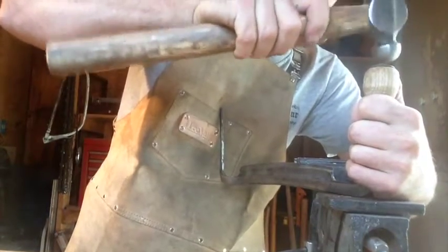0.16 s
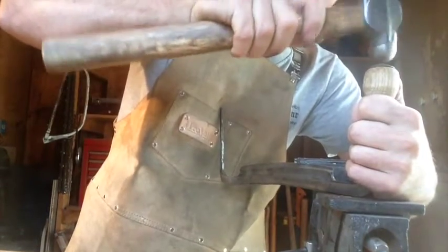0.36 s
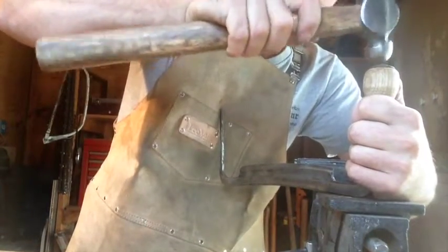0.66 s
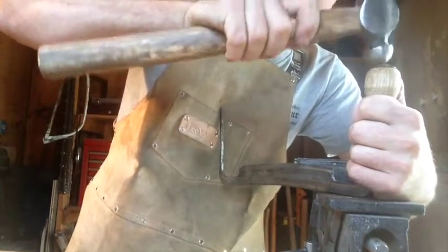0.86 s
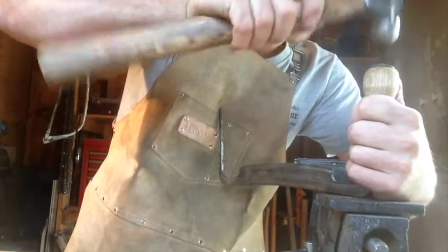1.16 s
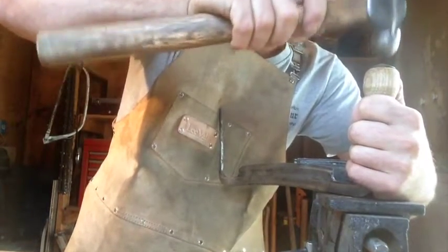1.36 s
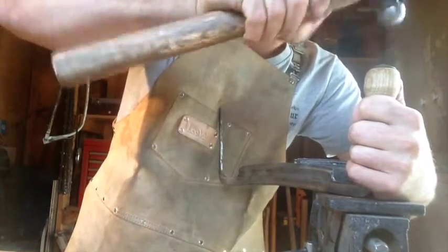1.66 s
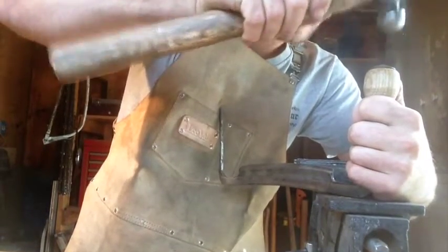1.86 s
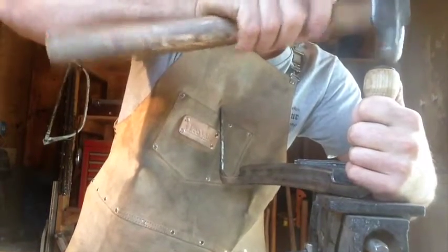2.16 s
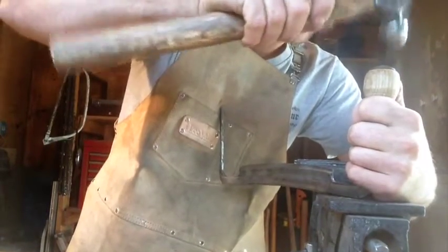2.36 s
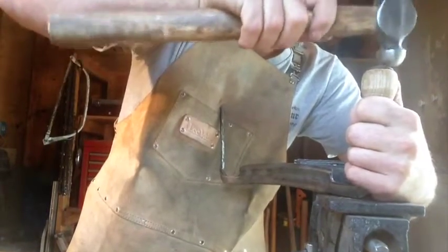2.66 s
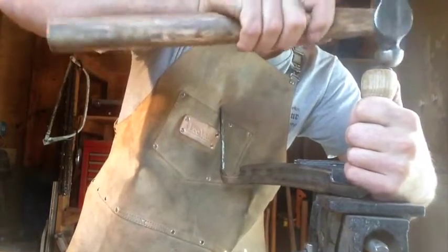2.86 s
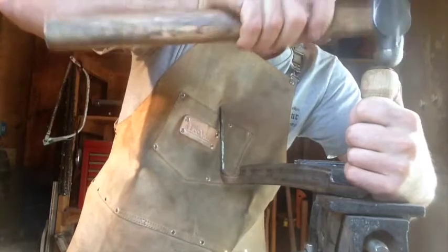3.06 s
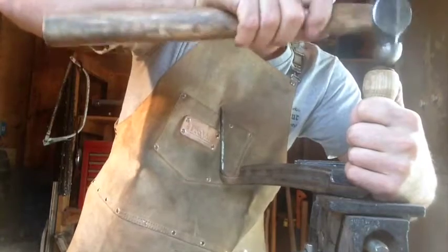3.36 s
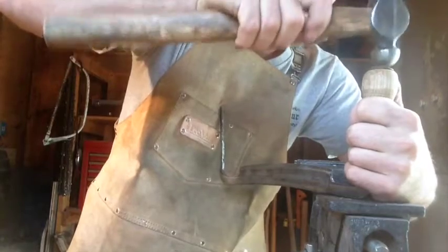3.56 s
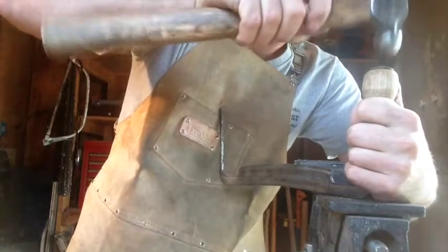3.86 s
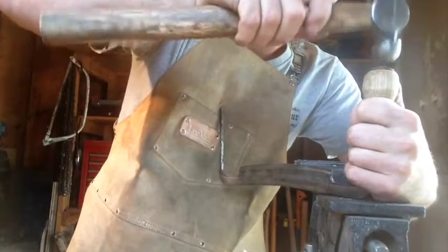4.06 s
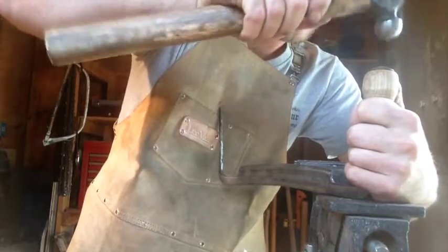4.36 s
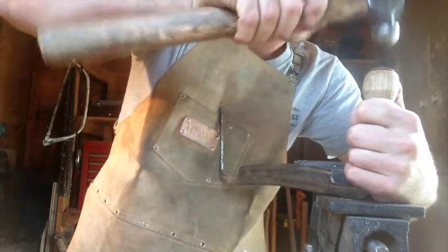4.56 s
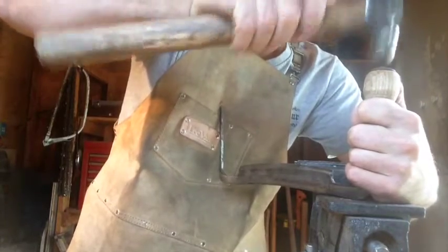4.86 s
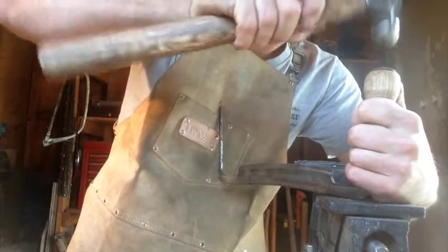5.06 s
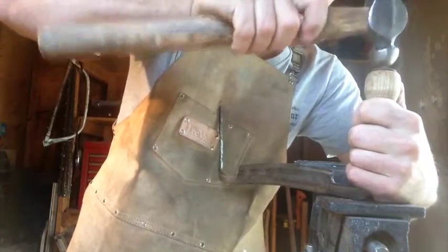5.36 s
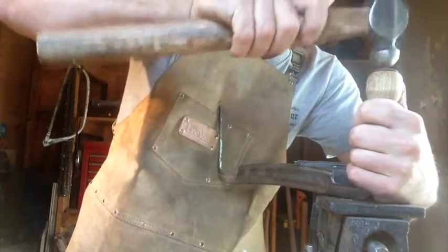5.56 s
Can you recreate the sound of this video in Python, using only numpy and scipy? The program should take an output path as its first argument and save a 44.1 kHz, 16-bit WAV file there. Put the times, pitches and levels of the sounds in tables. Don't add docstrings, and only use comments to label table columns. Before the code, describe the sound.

Steady light hammering on steel, recorded close by a phone in a dry wooden workshop. Every tap clicks hard, pings and clanks for a moment, then thumps the bench, which rocks back faintly. Strength and ring vary from blow to blow, and a few loose parts knock around 3.4 and 4.1 to 4.3 seconds. Behind it sit a barely audible ticking clock, soft leaf rustle and a low hush.

```python
import sys
import numpy as np
from scipy import signal
from scipy.fft import rfft, irfft, next_fast_len
from scipy.io import wavfile
from scipy.ndimage import uniform_filter1d

SR = 44100
rng = np.random.default_rng(int(sys.argv[2]) if len(sys.argv) > 2 else 0)


def master_out(mix):
    frames = np.transpose(np.atleast_2d(mix))
    ceiling = np.clip(frames, -1, 1)
    pcm = np.round(ceiling * 32767).astype(np.int16)
    wavfile.write(sys.argv[1], SR, pcm)


def invert_db(x):
    u = np.asarray(x, float) / 20
    return 10 ** u


N = 251935
RING = 12288
LEAD = 2000
AGE = np.arange(RING) / SR
USUAL_FORCE_DB = -20


def fade(t60, age=AGE):
    return np.exp(-np.log(1000) * np.maximum(age, 0) / t60)


def build_up(attack_s):
    return 1 - np.exp(-AGE / attack_s)


def end_taper(length_s):
    return np.clip((AGE[-1] - AGE) / length_s, 0, 1)


def unit(x, span_s):
    return x / np.sqrt(np.mean(x[..., :int(span_s * SR)] ** 2, axis=-1, keepdims=True))


def band(x, hz, octaves):
    n = next_fast_len(x.shape[-1])
    f = np.fft.rfftfreq(n, 1 / SR) + 1
    bell = np.exp(-.5 * (np.log2(f / hz) / octaves) ** 2)
    return irfft(rfft(x, n) * bell, n)[..., :x.shape[-1]]


def coloured(spectrum):
    f = np.fft.rfftfreq(N, 1 / SR) + 1
    hz, db = np.transpose(spectrum)
    x = irfft(rfft(rng.standard_normal(N)) * invert_db(np.interp(np.log(f), np.log(hz), db)), N)
    return x / x.std()


def wobble(shape, rate):
    knots = rng.standard_normal(shape + (int(rate * RING / SR) + 2,))
    position = AGE * rate
    k = position.astype(int)
    part = position - k
    return 1.1 * (knots[..., k] * (1 - part) + knots[..., k + 1] * part)


def held(rate):
    k = int(SR / rate)
    return uniform_filter1d(np.repeat(rng.standard_normal(N // k + 1), k), size=k // 4)[:N]


def modes(table, spread_db, detune, delay_s=0.):
    hz, db, t60 = np.transpose(table)[:3, :, None]
    chance = rng.standard_normal((len(TAPS), 2, len(table), 1))
    age = np.maximum(AGE - delay_s, 0)
    level = invert_db(db + spread_db * chance[:, 0])
    bent_hz = hz * (1 + detune * chance[:, 1])
    return level * fade(t60, age) * np.sin(2 * np.pi * bent_hz * age)


def place(times, rows):
    out = np.zeros(N + LEAD + RING)
    for s, row in zip(times, rows):
        k = int(round(s * SR)) + LEAD
        out[k:k + RING] += row * end_taper(.05)
    return out[LEAD:LEAD + N]


def small(table, hz, octaves, t60, attack_s=.0001):
    out = []
    for f, db in zip(hz, table[1]):
        burst = band(rng.standard_normal(RING), f, octaves) * fade(t60) * build_up(attack_s)
        out.append(invert_db(db) * burst / np.abs(burst).max())
    return place(table[0], out)


# (frequency [Hz], level [dB], t60 [s])
HEAD_MODES = [(1750, -32, 0.023), (2250, -34.5, 0.013), (2850, 1, 0.14), (3180, -21, 0.09),
              (3800, 10.5, 0.031), (4210, -27, 0.013), (4830, 14.5, 0.006), (5560, 5.5, 0.019),
              (5570, -1, 0.021), (6550, 9, 0.012), (7330, 8, 0.015), (7500, -29, .06)]


def crack(crack_db, fizz_db):
    click = -.45 * np.exp(-.5 * ((AGE - .0002) / .00006) ** 2)
    head = unit(modes(HEAD_MODES, spread_db=1.5, detune=0.018, delay_s=0.0002994).sum(1), 0.012)
    noise = rng.standard_normal((2, len(TAPS), RING))
    splinter = unit(band(noise[0], 3610, 0.31) * fade(0.054), 0.018)
    spit = unit(band(noise[1], 4430, 1.0) * fade(0.025), 0.0079)
    return click + invert_db(crack_db - 4.0) * head + invert_db(crack_db - 7.5) * splinter + invert_db(fizz_db + 4.0) * spit


# (time [s], frequency [Hz], level [dB])
HEAD_PINGS = [(0.1974, 2705, -16), (0.4311, 1830, -39), (0.6561, 2970, -17.5), (0.8836, 2840, -14),
              (1.103, 2900, -21.5), (1.5599, 2060, -20), (1.792, 2430, -14), (1.796, 1510, -5),
              (2.0189, 2850, -25), (2.2422, 2960, -24.5), (2.4654, 4210, -14), (2.687, 4100, -10.5),
              (2.689, 3580, -16), (2.9089, 3170, -25), (3.1338, 3150, -16), (3.3615, 2760, -18),
              (4.2716, 3830, -24.5), (4.274, 2740, -17), (4.5055, 3770, -32), (4.514, 1400, -12.5),
              (4.7278, 2250, -26.5), (4.951, 4030, -18), (5.1742, 1900, -25), (5.3893, 2890, -24),
              (5.601, 1920, -23)]


def pings():
    s, hz, db = np.transpose(HEAD_PINGS)[..., None]
    return place(s[:, 0], invert_db(db) * np.sin(2 * np.pi * hz * AGE) * fade(0.028) * build_up(0.0016))


# (frequency [Hz], level [dB], t60 [s])
STEEL_MODES = [(1200, -15, .1), (1335, -5, .16), (1362, 0, .18), (1390, -7, .25), (1415, -10, .2),
               (1480, -19, .32), (1560, -7, .1), (2032, -12, .16), (2510, -20, .15), (2869, -13, .14),
               (3176, -18, .15), (8000, -26, .17)]
# (frequency [Hz], level [dB], t60 [s])
VICE_MODES = [(510, -6, .16), (620, -3, .16), (712, -5, .15), (880, -8, .14), (1068, -3, .15)]


def steel(ring_db, bench_db):
    chatter = 1 + .45 * wobble((len(TAPS), len(STEEL_MODES)), rate=70)
    ring = np.sum(chatter * modes(STEEL_MODES, spread_db=0.5, detune=0.0036), axis=1)
    ring = ring * build_up(0.0042) ** 2
    clank = band(rng.standard_normal((len(TAPS), RING)), 1705, 0.29) * fade(0.16) * build_up(0.004)
    vice = modes(VICE_MODES, spread_db=4.0, detune=0.01).sum(1) * build_up(0.025)
    blade = invert_db(ring_db - 2.5) * unit(ring, 0.055) + invert_db(ring_db - 6.5) * unit(clank, 0.039)
    return blade + invert_db(bench_db - 16) * unit(vice, 0.035)


# (frequency [Hz], level [dB], t60 [s], way it first moves [+1 or -1], arrival [ms])
BENCH_MODES = [(62.1, -32.3, 0.298, -1.0, 17.28), (88.3, -18.2, 0.121, -1.0, 2.28),
               (106.7, -22.7, 0.224, 1.0, 5.51), (136.5, -23.2, 0.247, 1.0, 6.05),
               (164.7, -15.7, 0.237, 1.0, 5.98), (172.1, -14.2, 0.082, -1.0, 7.41),
               (237.2, -10.2, 0.051, 1.0, 5.0), (278.2, -7.6, 0.02, -1.0, 6.0),
               (289.0, -21.4, 0.073, 1.0, 1.3), (330.1, -21.7, 0.161, -1.0, 2.08),
               (431.0, -18.2, 0.097, 1.0, 1.45), (545.7, -16.0, 0.02, 1.0, 0.96),
               (623.2, -20.6, 0.043, -1.0, 0.12), (706.1, -30.7, 0.102, -1.0, 1.45)]
# (time after the blow [s], share of the blow [ratio])
BENCH_ROCKS = [
    (0, 1),
    (.0408, .24),
    (.0713, -.094),
]


def bench(bench_db, sway_db, ring_db):
    hz, _, _, way, start_ms = np.transpose(BENCH_MODES)[..., None]
    sways = (hz > 140) & (hz < 200)
    db = np.where(sways, sway_db[:, None] + 31.5, bench_db[:, None] + 21.0)
    db = db + np.where(hz < 140, -.6, 0)
    top_board = (hz > 220) * (hz < 300)
    db = db - top_board * .8 * (bench_db[:, None] - USUAL_FORCE_DB)
    db = db - (hz > 400) * 0.22 * (ring_db[:, None] + 27.5)
    moving = modes(BENCH_MODES, spread_db=.8, detune=.003, delay_s=start_ms / 1000)
    ring = np.sum(way * invert_db(db) * moving, axis=1)
    ring = signal.lfilter(*signal.butter(1, 2500, fs=SR), ring) * end_taper(.1)
    strength = invert_db(2.5 * rng.standard_normal((len(TAPS), len(BENCH_ROCKS))))
    strength[:, 0] = 1
    out = 0
    for k, (s, share) in enumerate(BENCH_ROCKS):
        out = out + share * strength[:, [k]] * np.roll(ring, int(s * SR), axis=1)
    return out


def tools(crack_db, count=30):
    hz = 1600 * 2.8 ** rng.random((count, 1))
    chance = rng.random((len(TAPS), 3, count, 1))
    age = np.maximum(AGE - .035 * chance[:, 0], 0)
    t60 = .025 + .04 * chance[:, 2]
    tones = invert_db(-12 * chance[:, 1]) * np.sin(2 * np.pi * hz * age) * fade(t60, age)
    return invert_db(.5 * crack_db - 32.5) * unit(tones.sum(1), 0.11)


# (time [s], peak level [dB], frequency [Hz])
LOOSE_PARTS = [
    (0.2482, -22.5, 3130),
    (3.4004, -13.5, 450),
    (4.095, -18, 420),
    (4.312, -15, 428),
]


def rattles():
    jumps = np.transpose(LOOSE_PARTS)
    return small(jumps, jumps[2], 0.49, 0.036, attack_s=0.00079)


# (frequency [Hz], level [dB], t60 [s])
SHED_DECAY = [(68.7, -25.5, 1), (208, -3.5, 0.21), (500, -9.5, 0.23), (1060, -6, 0.18), (1920, -4, 0.29),
              (3000, 11, 0.21), (4780, 12.5, 0.17), (7030, -1, 0.19), (9000, -14, 0.1),
              (15000, -15.5, 0.15)]


def shed(crack_db, fizz_db, bench_db):
    noise = 0.43 * rng.standard_normal(RING) + 1.13 * rng.standard_normal((len(TAPS), RING))
    hz, db, t60 = np.transpose(SHED_DECAY)
    out = 0
    for centre in 60 * 2 ** (np.arange(17) / 2):
        gain_db = np.interp(np.log(centre), np.log(hz), db)
        decay = np.interp(np.log(centre), np.log(hz), t60)
        if centre < 1500:
            drive_db = bench_db
        elif centre < 5500:
            drive_db = 0.83 * crack_db - 23.0
        else:
            drive_db = 0.87 * fizz_db
        patchy_db = 2.5 * wobble((len(TAPS),), rate=45) * (centre > 1200)
        level = invert_db(gain_db + drive_db + patchy_db - 3.5)
        out = out + level * unit(band(noise, centre, 0.29), 0.42) * fade(decay)
    return out * build_up(0.0039)


# (time [s], peak level [dB], hiss after it [dB])
LOUD_TICKS = [
    (0.1135, -47.5, -12.5),
    (1.0086, -49.5, -13.5),
    (5.2686, -60, -13),
]
# (frequency [Hz], width [Hz], level [dB])
CLOCK_CASE = [(7560, 32, 4.5), (8900, 25, -6), (9210, 29, 0), (10200, 28, -4), (10500, 70, -2.5),
              (11000, 67, -2), (11400, 33, 0), (12200, 38, -5)]


def ticks():
    beat = np.arange(13)
    is_tock = beat % 2
    beat_s = .112 + .4489 * beat - .012 * is_tock
    beat_db = np.where(is_tock, -59, -57)
    ring_db = np.where(is_tock, -95, -79)
    beat_hiss_db = np.where(is_tock, -9, -10)
    hz, _, mode_db = np.transpose(CLOCK_CASE)[..., None]
    ring = unit(np.sum(invert_db(mode_db) * np.sin(2 * np.pi * hz * AGE), axis=0) * fade(.35), 0.046)
    s, db, hiss_db = np.c_[np.transpose(LOUD_TICKS), [beat_s, beat_db, beat_hiss_db]]
    click = small((s, db), np.full(len(s), 7500.), .7, 0.018)
    hiss = small((s, db + hiss_db), np.full(len(s), 7000.), .9, 0.65)
    return click + hiss + place(beat_s, invert_db(ring_db)[:, None] * ring)


def bird():
    start_s, end_s, hz, level_db = 3.24, 3.36, 2100, -65
    t = np.arange(N) / SR
    breath = np.sin(np.pi * np.clip((t - start_s) / (end_s - start_s), 0, 1)).clip(0)
    return invert_db(level_db) * np.sqrt(breath) * np.sin(2 * np.pi * hz * t)


# (frequency [Hz], level per Hz [dB])
HUSH_SPECTRUM = [(24, -39.5), (40, -2), (167, 8), (918, -20), (1070, -10), (1810, -20.5), (2100, -34),
                 (2570, -27), (9220, -57.5), (16000, -82)]
# (time [s], peak level [dB])
LEAF_GUSTS = [
    (.25, -56),
    (.48, -65),
    (1.06, -67),
    (4.01, -66.5),
    (5.71, -71.5),
]


def hush():
    calm_db, rise_db_s, fall_db_s = -76.5, 80, 150.5
    rustle = band(rng.standard_normal(N), 5200, .8)
    s, peak_db = np.transpose(LEAF_GUSTS)[..., None]
    since = np.arange(N) / SR - s
    gust_db = peak_db - np.where(since < 0, -rise_db_s * since, fall_db_s * since)
    swell_db = np.maximum(gust_db.max(axis=0), calm_db) + 2.0 * held(rate=8)
    return invert_db(-52.5) * coloured(HUSH_SPECTRUM) + invert_db(swell_db - 3.0) * rustle / rustle.std()


# (frequency [Hz], level per Hz [dB])
WIDE_SPECTRUM = [(24, -46), (40, -17.5), (251, 0.5), (466, -8), (554, -15.5), (1170, -7), (1730, -26),
                 (2340, -16.5), (15000, -45)]


def wide():
    noise = coloured(WIDE_SPECTRUM)
    out = 0
    for centre in 60 * 2 ** (np.arange(17) / 2):
        out = out + invert_db(6.0 * held(rate=9)) * band(noise, centre, 0.11)
    return invert_db(-74) * out


# (time [s], force on the bench [dB], blade ring [dB], face crack [dB])
TAPS = [(-0.0335, -20, -29, -23), (0.1974, -18.5, -24.5, -25.5), (0.4307, -19, -28, -25),
        (0.6538, -22, -33, -23.5), (0.8833, -21, -33.5, -22.5), (1.102, -21, -35.5, -26.5),
        (1.3318, -21, -32.5, -24.5), (1.56, -20, -25, -24), (1.79, -17, -26, -22),
        (2.0187, -18.5, -23, -24), (2.2428, -19, -30, -25), (2.4654, -21.5, -47, -23.5),
        (2.686, -22.5, -32.5, -25.5), (2.9079, -20, -29.5, -22), (3.1343, -20, -31, -22),
        (3.3621, -18.5, -28.5, -24), (3.588, -21.5, -28.5, -29), (3.825, -21.5, -30, -25),
        (4.0494, -19, -25, -22), (4.2719, -18.5, -24.5, -22.5), (4.5058, -19.5, -25.5, -25),
        (4.7298, -20.5, -29, -24.5), (4.951, -21, -28.5, -24.5), (5.1711, -22.5, -32.5, -25.5),
        (5.3872, -18.5, -24, -22.5), (5.6007, -22, -32, -25)]


def scene():
    s, *levels = np.transpose(TAPS)
    bench_db, ring_db, crack_db = (c[:, None] for c in levels)
    extra_ring_db = ring_db - ring_db.mean()
    sway_db = -30.5 + 1.27 * (bench_db - USUAL_FORCE_DB) + 0.083 * extra_ring_db
    fizz_db = -33.5 + 0.98 * (crack_db + 24.5) - 0.11 * extra_ring_db
    thump = np.roll(bench(bench_db, sway_db, ring_db), -22, axis=1)
    blows = crack(crack_db, fizz_db) + steel(ring_db, bench_db) + thump
    blows = blows + tools(crack_db) + shed(crack_db, fizz_db, bench_db)
    far = ticks()
    mid = place(s - .0002, blows) + pings() + rattles() + far + bird() + hush()
    side = wide() + invert_db(-6) * far
    return np.array([mid + side, mid - side])


def low_pass(x):
    return signal.sosfilt(signal.butter(12, 16430, fs=SR, output="sos"), x)


def record(dry):
    x = signal.sosfilt(signal.butter(2, 30, "high", fs=SR, output="sos"), dry)
    mid, side = (x[0] + x[1]) / 2, (x[0] - x[1]) / 2
    mid = 0.67 * np.tanh(mid / 0.7)
    top = signal.sosfilt(signal.ellip(8, .2, 70, 15150, fs=SR, output="sos"), mid)
    mid = top + invert_db(-30) * (mid - top)
    ghost = band(np.roll(mid, -1024), 5000, .8)
    ghost = ghost * invert_db(3.7 * held(rate=2.9))
    blur = rng.standard_normal(540) * np.linspace(1, .6, 540)
    smear = signal.fftconvolve(mid[::-1], blur / np.linalg.norm(blur))[:N][::-1]
    smear = smear * (.7 + .7 * held(rate=400)) * invert_db(1.5 * held(rate=6))
    early = invert_db(-10) * band(smear, 1700, 0.2) + invert_db(-31) * band(smear, 6600, 0.89)
    early = early + invert_db(-14) * band(smear, 300, 0.9)
    mid = mid + invert_db(-37) * ghost + early
    side = side * (uniform_filter1d(np.abs(mid), size=1500) < invert_db(-32))
    leak_s, leak_length_s, leak_db = 2.2545, .004, -4
    leak = np.exp(-.5 * ((np.arange(N) / SR - leak_s) / (leak_length_s / 2)) ** 2)
    side = side + invert_db(leak_db) * leak * band(mid * held(rate=3000), 7000, 0.55)
    return low_pass(np.array([mid + side, mid - side]))


dry = scene()
out = record(dry)
master_out(out)
```